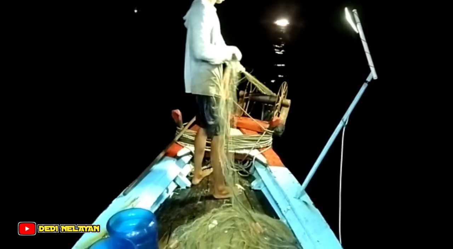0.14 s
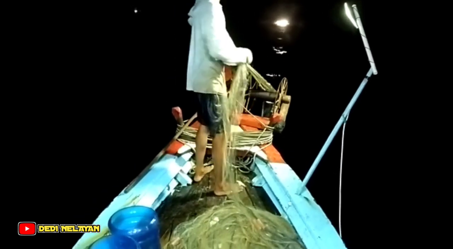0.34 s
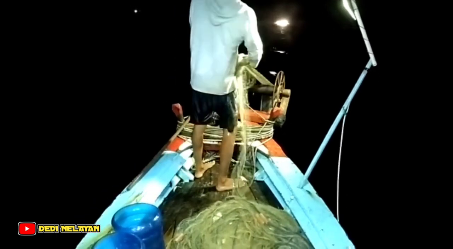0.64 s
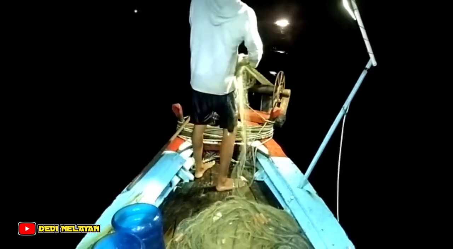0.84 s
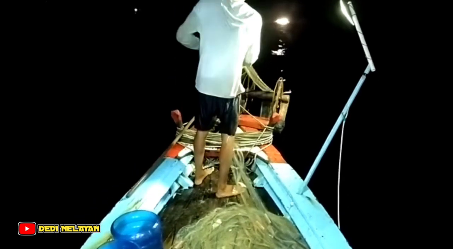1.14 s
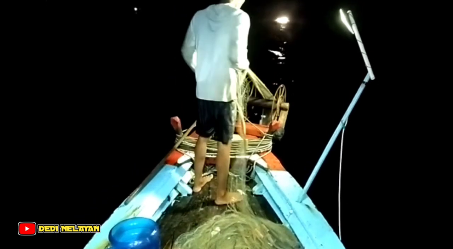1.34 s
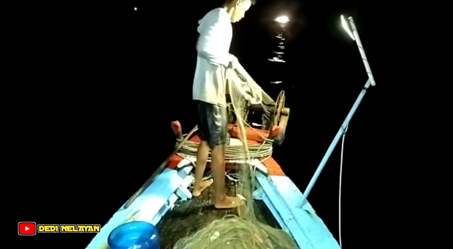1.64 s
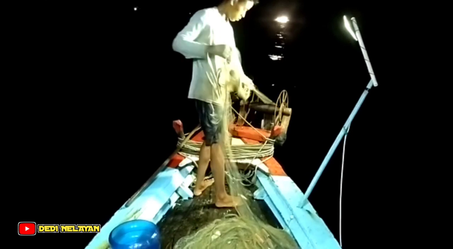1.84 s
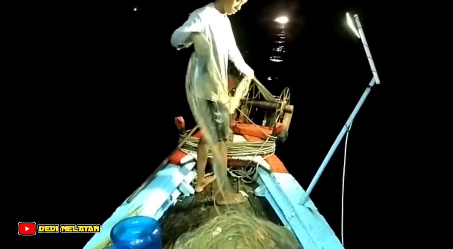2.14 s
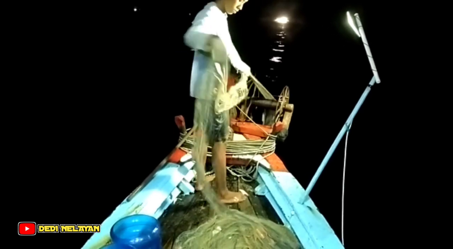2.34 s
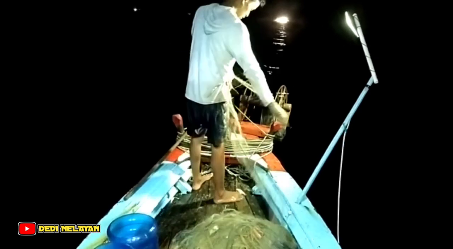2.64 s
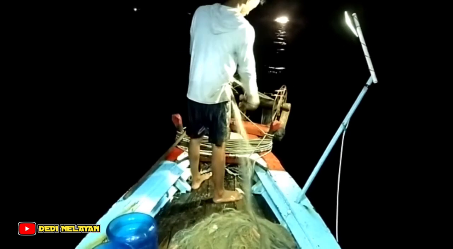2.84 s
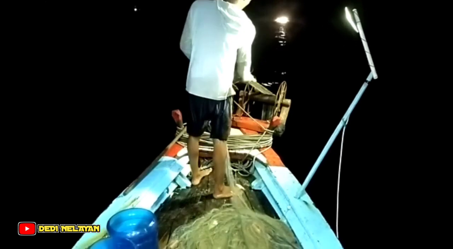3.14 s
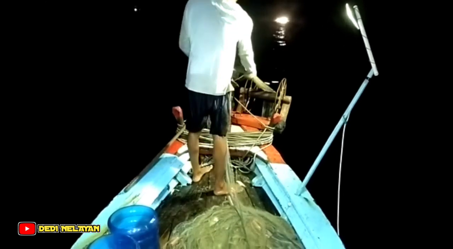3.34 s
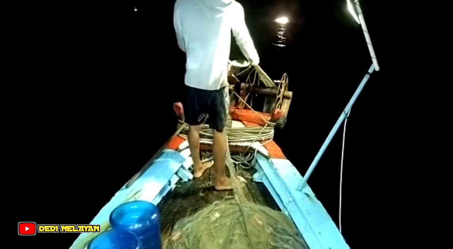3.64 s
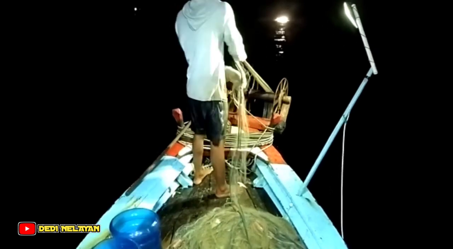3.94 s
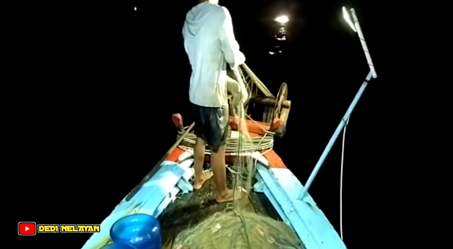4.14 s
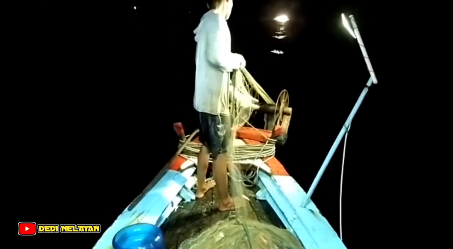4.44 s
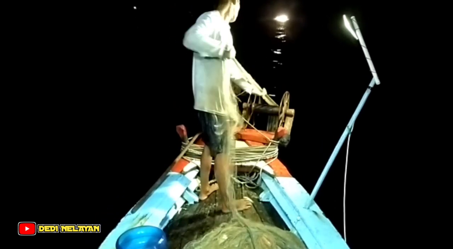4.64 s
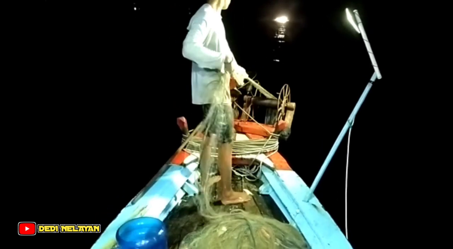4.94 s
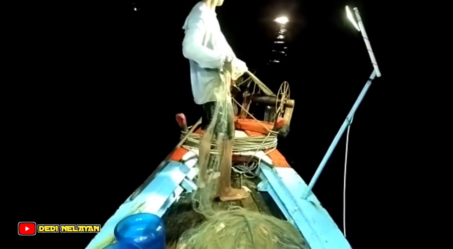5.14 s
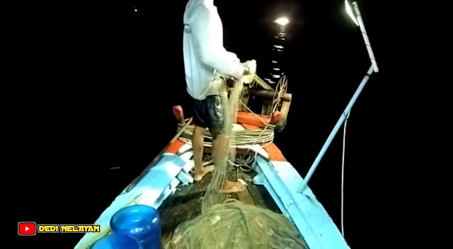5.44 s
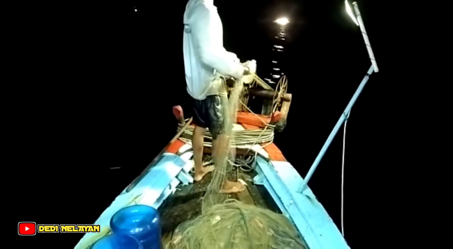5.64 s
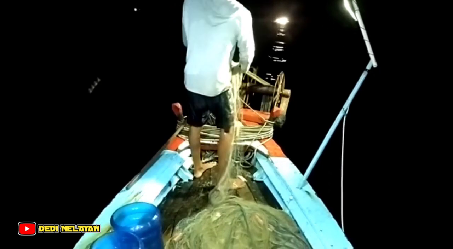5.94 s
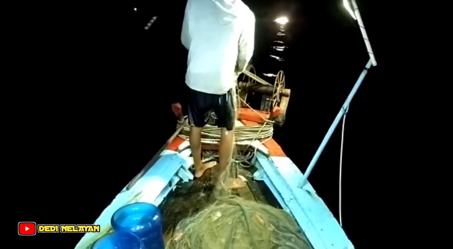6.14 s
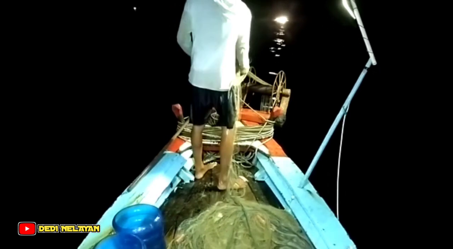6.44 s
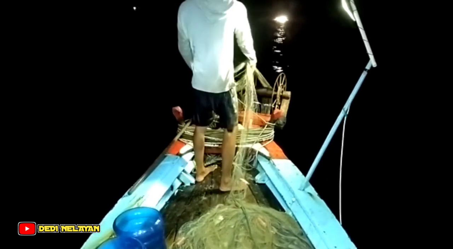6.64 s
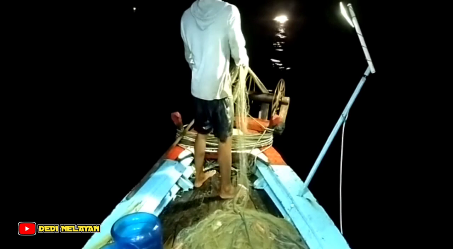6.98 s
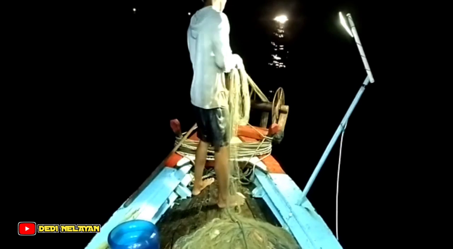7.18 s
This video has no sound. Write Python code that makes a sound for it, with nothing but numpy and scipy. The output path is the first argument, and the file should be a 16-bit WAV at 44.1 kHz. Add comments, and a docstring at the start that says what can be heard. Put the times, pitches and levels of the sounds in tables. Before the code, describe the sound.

Wet fishing net hauled into a small wooden boat at night: hollow hull thumps, float clacks, sharp mesh snaps, rustling and dripping water.

```python
"""Sinkers on a wet fishing net thump the hollow hull as it is hauled over a wooden roller into a small boat
at night: damped plank and hull modes. Floats clack and small sinkers touch as clusters of damped modes; hard
edges slap the rail. Mesh snaps, rustle, spray, rope drag and lapping water are shaped noise with small tones.
The axle ticks into the roller's resonances. Behind: keel swell, sea hiss and faint unsteady engine tones."""
import sys
import numpy as np
from scipy import signal
from scipy.fft import rfft, irfft, next_fast_len
from scipy.io import wavfile
from scipy.ndimage import uniform_filter1d, map_coordinates

SR = 44100
rng = np.random.default_rng(int(sys.argv[2]) if len(sys.argv) > 2 else 0)


def dump_mix(stems):
    """Bounce the given channels to the path in sys.argv[1] as a 16-bit WAV at rate SR."""
    frames = np.atleast_2d(stems).T  # one column per channel
    limited = np.clip(frames, -1, 1)  # hard clip at full scale
    pcm = np.round(limited * 32767).astype(np.int16)
    wavfile.write(sys.argv[1], SR, pcm)


N = 322363

# sinkers on the hull: t/s, peak level/dB, plank f/Hz, t60/s
HULL_THUMPS = [(.047, -24, 317, 0.091), (.443, -26.5, 431, 0.11), (.534, -40, 282, 0.095),
               (0.751, -39, 358, 0.18), (0.936, -30, 396, 0.13), (1.139, -37.5, 282.4, 0.49),
               (1.194, -34.5, 310, 0.029), (1.253, -28.5, 289, 0.23), (1.623, -32.5, 369, 0.065),
               (1.677, -22, 292.6, .15), (1.699, -27, 380, 0.052), (1.759, -36, 299, 0.3),
               (1.784, -28.5, 296, 0.11), (2.243, -51.5, 277, .19), (2.339, -31, 347.4, 0.075),
               (2.385, -44.5, 145, 0.086), (2.532, -40.5, 280, 0.13), (2.578, -33.5, 226, 0.086),
               (2.609, -50, 213, 0.18), (2.681, -40, 331, 0.1), (2.731, -52, 184, 0.14),
               (3.004, -38, 332, 0.11), (3.041, -37, 201, 0.086), (3.06, -39.5, 118, 0.18),
               (3.09, -31.5, 304, 0.032), (3.12, -28, 247, 0.11), (3.152, -39.5, 206, 0.36),
               (3.194, -23.5, 327.3, 0.15), (3.797, -47, 204, 0.14), (3.889, -43, 270, 0.12),
               (3.917, -45, 170, 0.28), (3.96, -49, 194, 0.2), (4.309, -31.5, 309, 0.12),
               (4.348, -41.5, 209.5, 0.48), (4.398, -38, 209, 0.22), (4.439, -43, 309, 0.18),
               (4.605, -36.5, 390, 0.091), (4.65, -29.5, 313.4, 0.16), (4.725, -22.5, 360.7, 0.086),
               (4.747, -29, 236, 0.043), (5.177, -35.5, 301, 0.1), (5.288, -28.5, 139.7, 0.2),
               (5.32, -36.5, 153, 0.19), (5.357, -40.5, 129, 0.3), (5.649, -50, 293, 0.11),
               (5.712, -48.5, 252, 0.66), (5.831, -36.5, 294, 0.087), (5.844, -33.5, 300, 0.13),
               (6.241, -53.5, 184, 0.23), (6.589, -41.5, 107, 0.036), (6.812, -42.5, 269, .2),
               (6.939, -48, 151, 0.067), (7.088, -37.5, 283, 0.2), (7.133, -36.5, 201, 0.099),
               (7.159, -42, 227, 0.056), (7.241, -53, 179, 0.16)]
# floats on the frame: t/s, peak level/dB, ring f/Hz, t60/s
FLOAT_CLACKS = [(.031, -37, 556, 0.073), (.241, -42.5, 944, 0.078), (.413, -41, 746, 0.084),
                (.43, -35.5, 794, 0.041), (.473, -39, 659, .043), (.631, -44, 860, 0.03),
                (.718, -43.5, 634, 0.18), (.773, -47.5, 1102, 0.11), (.814, -46, 1230, .1),
                (.88, -43, 1277, .16), (.936, -47.5, 1360, .056), (1.196, -40.5, 606, 0.044),
                (1.256, -34.5, 770, 0.033), (1.35, -42, 1100, 0.11), (1.481, -39.5, 643, 0.27),
                (1.674, -32.5, 1004, 0.06), (1.756, -41, 573, 0.14), (1.879, -53.5, 1023, 0.66),
                (1.929, -47.5, 1053, 0.3), (2.05, -47, 1048, .1), (2.256, -54.5, 618, 0.23),
                (2.339, -41.5, 591, 0.069), (2.528, -49, 810, 0.045), (2.608, -51, 1236, 0.1),
                (2.752, -42.5, 1065, .1), (2.789, -44.5, 886, 0.089), (2.819, -50.5, 683, 0.075),
                (3.014, -53, 681, 0.45), (3.046, -43, 713, 0.068), (3.111, -39.5, 566, 0.086),
                (3.186, -41.5, 580, 0.033), (3.359, -49.5, 795, 0.19), (3.389, -42.5, 631, 0.14),
                (3.926, -60, 774, 0.098), (4.299, -45, 540, 0.023), (4.607, -46, 710, 0.039),
                (4.651, -32.5, 550, 0.065), (4.693, -42, 860, 0.068), (4.72, -33.5, 603, 0.086),
                (4.739, -41, 560, 0.034), (4.941, -54, 1200, 0.076), (4.996, -45, 980, 0.12),
                (5.063, -46.5, 769, 0.091), (5.114, -58.5, 850, 0.13), (5.293, -43.5, 835, .11),
                (5.313, -42, 840, 0.048), (5.366, -53.5, 788, 0.092), (5.498, -58, 649, 0.36),
                (5.543, -60, 631, 0.23), (5.834, -55, 848, 0.56), (5.901, -49.5, 777, 0.09),
                (6.115, -61.5, 577, 0.12), (6.36, -49, 886, 0.66), (6.389, -41, 684, 0.11),
                (6.81, -50, 629, .1), (7.084, -52.5, 802, .1), (7.134, -45, 583, 0.056)]
# wet strands parting: t/s, level/dB, band centre f/Hz, treble level/dB, t60/s
MESH_SNAPS = [(0.0373, -38, 3060, -21, .057), (0.3316, -37, 2870, -17, 0.1), (.4288, -39.5, 3200, -24, .1),
              (0.5223, -35.5, 3860, -13, .046), (.672, -42, 3420, -12, 0.043),
              (0.7312, -21, 3160, -10.5, 0.024), (0.965, -45, 3650, -24, 0.032),
              (1.2494, -36.5, 2930, -13, 0.065), (1.287, -44, 3800, -8, 0.045),
              (1.3912, -46, 3150, -2, 0.035), (1.506, -44, 3470, -18, 0.11),
              (1.6357, -43, 2960, -12, 0.019), (1.6746, -36, 2950, -45, 0.036),
              (1.7122, -32, 3130, -31, .014), (1.8356, -46, 5000, 2, 0.027), (1.936, -43, 3150, -15, 0.054),
              (2.2463, -49, 3200, -22, 0.13), (2.3464, -48, 3450, -26, 0.056), (2.38, -51, 3770, -10, .058),
              (2.4314, -67, 5030, -15, 0.026), (2.6867, -50, 4500, -3, .04),
              (2.7339, -40.5, 3400, -26, 0.051), (2.8856, -41.5, 4240, -12, 0.021),
              (2.976, -48, 4520, -21, 0.023), (3.0194, -51, 3300, -16, 0.23),
              (3.029, -41.5, 6800, -29, 0.1), (3.0417, -37, 3400, -10, 0.09),
              (3.0846, -45, 3120, -3, 0.057), (3.1115, -29, 3140, -9, 0.038),
              (3.1844, -29, 3320, -18, 0.03), (3.297, -49, 5450, -7, .02),
              (3.3488, -35.5, 5130, -0.5, 0.022), (3.414, -36.5, 5700, 2, 0.021),
              (3.4379, -31, 4160, -5, 0.013), (4.091, -46.5, 7050, -49, 0.021),
              (4.1715, -50, 3480, -33, 0.038), (4.291, -40.5, 6230, -26, 0.024),
              (4.335, -35.5, 6300, -41, 0.021), (4.358, -39, 3220, 0, 0.016),
              (4.3824, -43, 2890, -13, .027), (4.413, -36, 2690, -21, 0.026),
              (4.434, -43, 6250, -20, 0.026), (4.476, -40.5, 6050, -50, 0.014),
              (4.5133, -44, 3350, -26, 0.032), (4.5994, -43, 3100, -30, 0.026),
              (4.689, -50, 2820, -32, 0.061), (4.7197, -31, 3070, -19, 0.044),
              (4.7704, -41.5, 4100, -11, 0.029), (4.8578, -40.5, 3360, -12, 0.021),
              (4.9895, -45.5, 4330, -8, .045), (5.0848, -49, 3770, -33, 0.022),
              (5.212, -52.5, 6500, -31, .03), (5.498, -60, 3980, -22, .08),
              (5.542, -51.5, 3280, -23, 0.075), (5.738, -57, 5500, -20, 0.033),
              (5.8194, -50, 4450, -18, 0.02), (5.8313, -39, 4070, -14, 0.03), (5.961, -54, 4140, -1, 0.11),
              (6.05, -54.5, 5500, 1, 0.017), (6.451, -45, 3530, 2, 0.025), (6.569, -51.5, 3960, -4, 0.19),
              (6.658, -47, 4480, -10, .03), (6.6764, -40, 4040, -38, .014), (6.725, -44, 4500, -28, 0.018),
              (6.7488, -31, 4430, -36, 0.016), (6.8053, -40.5, 3640, -9, 0.036),
              (6.8307, -43.5, 3000, -17, 0.13), (6.9367, -51, 2880, -9, 0.041),
              (7.081, -47, 2730, -12, 0.12), (7.1207, -43.5, 2860, -8.5, 0.13),
              (7.2747, -47, 3900, -16, 0.05)]


def thumps():
    """The struck plank's pitch sinks slightly; hull modes near it answer, the higher dying sooner."""
    # hull modes: f/Hz, level/dB
    hull_modes = [(98, -5), (125, -5), (155, -8.5), (186, -13), (222, -1), (255, -0.5), (305, 2), (345, 2),
                  (380, 0.5), (430, 4.5), (480, 0), (560, -5.5)]
    contact_s = 0.0058
    out, t = np.zeros((2, N)), np.arange(SR // 5) / SR
    hz, mode_db = np.transpose(hull_modes)[:, :, None]
    for s, db, plank_hz, t60_s in HULL_THUMPS:
        level_chance, phase_chance = rng.standard_normal((2, len(hull_modes), 1))
        near_db = -np.minimum(30 * np.abs(np.log2(hz / plank_hz)) ** 1.69, 20.5)
        plank_t60_s = max(t60_s, 0.02)
        mode_t60_s = plank_t60_s * (plank_hz / hz) ** 0.92
        mode_gain = amp(mode_db + near_db + 3.3 * level_chance - 60 * t / mode_t60_s)
        hull = mode_gain * np.cos(2 * np.pi * hz * t + 1.82 * phase_chance)
        plank_cycles = plank_hz * np.cumsum(1 + 0.12 * np.exp(-t / 0.014)) / SR
        plank = amp(-60 * t / plank_t60_s) * np.sin(2 * np.pi * plank_cycles)
        # force builds up over the contact time
        force = np.sin(np.pi / 2 * np.minimum(t / contact_s, 1)) ** 2
        ring = (plank + 1.09 * hull.sum(axis=0)) * force
        add(out, s, amp(db) * ring / np.abs(ring).max())
    return out


def slaps():
    """A hard edge strikes the rail: one sharp push and pull, then a broad woody rattle."""
    # strikes: t/s, push level/dB, centre f/Hz, rattle t60/s
    strikes = [(0.4483, -16.5, 700, 0.2), (1.256, -62, 770, 0.05), (1.6752, -20.5, 1065, 0.14),
               (3.186, -33, 930, 0.14), (4.718, -29, 930, 0.2), (5.833, -46, 1150, 0.39)]
    out, t = np.zeros((2, N)), np.arange(4096) / SR
    f = np.fft.rfftfreq(len(t), 1 / SR) + 1
    for s, db, hz, t60_s in strikes:
        push = -np.sin(2 * np.pi * hz * t) * np.exp(-(hz * t - 0.5) ** 2 / 0.14)
        band = amp(-14 * np.log2(f / hz) ** 2)
        rattle = unit(irfft(rfft(rng.standard_normal(len(t))) * band))
        fade = amp(-60 * t / t60_s) * (1 - np.exp(-t / 0.0009))
        add(out, s, amp(db) * (push + 0.11 * rattle * fade))
    return out


def clacks():
    """Hollow floats knock on the frame and small sinkers touch: clusters of damped modes."""
    # small sinkers touching: t/s, peak level/dB, ring f/Hz, t60/s
    plinks = [(0.332, -45, 1667, 0.075), (.3482, -42, 1414, 0.04), (0.5193, -32, 2384, 0.027),
              (.611, -43, 2096, .047), (1.3493, -42, 1810, .087), (1.4038, -43.5, 2560, 0.025),
              (1.6756, -43, 1344, 0.095), (1.926, -49, 2410, .07), (2.0518, -42.5, 1830, 0.046),
              (2.7661, -45.5, 1395, 0.13), (3.0464, -45.5, 2220, 0.052), (3.196, -41.5, 1400, 0.05),
              (3.5444, -58.5, 1450, 0.13), (3.7728, -57, 2200, 0.054), (3.792, -52, 2440, .031),
              (4.4131, -40.5, 1460, 0.035), (4.6797, -43.5, 1370, 0.045), (4.7977, -51.5, 1800, 0.074),
              (5.0623, -40, 1730, .055), (5.127, -52, 1654, .04), (5.22, -55, 1430, 0.039),
              (5.3213, -48.5, 1860, 0.06), (5.4955, -52, 1890, 0.059), (5.542, -50.5, 1954, 0.031),
              (6.2575, -52, 2514, .076), (6.3583, -55.5, 1623, .089), (6.4618, -50, 1365, 0.076),
              (6.591, -55, 1440, 0.087), (6.8286, -45.5, 1378, .11), (7.0307, -51.5, 2660, .05),
              (7.0452, -54, 2100, 0.036)]
    # modes of a float: pitch ratio, level/dB
    float_modes = [(0.839, -7.5), (0.939, -2.5), (1, 4.5), (1.072, -2.5), (1.219, -4), (1.449, -4.5),
                   (1.75, -4.5), (2.2, -10.5), (2.6, -9)]
    # modes of a small sinker: pitch ratio, level/dB
    sinker_modes = [(0.902, -10), (0.968, -24.5), (0.998, -4), (1.048, -10), (1.154, -9)]
    pan_db = -0.2  # left over right
    out = np.zeros((2, N))
    ratio, mode_db = np.transpose(float_modes)[:, :, None]
    for s, db, hz, t60_s in FLOAT_CLACKS:
        ring = ringing(hz * ratio, mode_db, t60_s, attack_s=0.00067)
        add(out, s, placed(ring, db, pan_db, lag_spread=4.8))
    ratio, mode_db = np.transpose(sinker_modes)[:, :, None]
    for s, db, hz, t60_s in plinks:
        ring = ringing(hz * ratio, mode_db, t60_s, attack_s=0.0016)
        add(out, s, placed(ring, db, pan_db, lag_spread=6.3))
    return out


def snaps():
    """Wet strands part: noise puffs in a broad band plus a treble band, partly alike left and right."""
    pan_db = np.array([[2.3 / 2], [-2.3 / 2]])  # left over right
    out, t = np.zeros((2, N)), np.arange(4096) / SR
    f = np.fft.rfftfreq(len(t), 1 / SR) + 1
    for s, db, hz, treble_db, t60_s in MESH_SNAPS:
        noise = rng.standard_normal((3, len(t)))
        pair = 0.82 * noise[0] + noise[1:]
        treble = amp(treble_db) / (1 + (7500 / f) ** 6) / (1 + (f / 12000) ** 3)
        band = amp(-22 * np.log2(f / hz) ** 2) + treble
        fade = amp(-60 * t / max(t60_s, 0.005)) + 1.56 * amp(-60 * t / 0.025)
        puff = unit(irfft(rfft(pair) * band)) * fade * (1 - np.exp(-t / 0.0048))
        add(out, s, amp(db - 10 + pan_db) * puff)
    return out


def net(rustle, mist):
    """Mesh rustle and spray: noise gated by one crackle of contacts, plus short tones for the knots."""
    # rustle spectrum: f/Hz, level/dB
    mesh_spectrum = [(1060, -17), (1800, -2.5), (2620, -7), (2790, -0.5), (3210, -4), (3500, -5.5),
                     (5060, -8.5), (7000, -10), (9100, -23), (15400, -120)]
    # spray spectrum: f/Hz, level/dB
    spray_spectrum = [(3240, -5), (5500, -3), (5800, -5.5), (8670, -3.5), (11400, -14), (14400, -13.5),
                      (15100, -14), (15800, -28.5)]
    crackle = bursts(420, spread_db=0, life_s=0.0037)
    knots = amp(-16.5) * rustle * droplets(count=1200, centre_hz=3950, cycles=0.71, spread_db=-3.0)
    mesh = rustle * texture(mesh_spectrum, 0.45 + crackle, patchy_db=4.5)
    spray = mist * texture(spray_spectrum, 1.2 + crackle, patchy_db=4.0)
    return knots + mesh + spray


def rope_drag(rumble):
    """Rope rumbles on the planks: low noise gated by slow random contacts."""
    # plank spectrum: f/Hz, level/dB
    plank_spectrum = [(65, -30), (110, -10.5), (189, 4.5), (242, -5), (354, -1.5), (486, -17.5),
                      (618, -28.5), (700, -21), (910, -37.5), (1540, -120)]
    grain = 0.35 + bursts(35, spread_db=6.5, life_s=0.026)
    return rumble * texture(plank_spectrum, grain, patchy_db=None)


def water(lapping):
    """Lapping is patchy, grainy noise; drips are short tones rising in pitch."""
    # lapping spectrum: f/Hz, level/dB
    water_spectrum = [(260, -18.5), (450, 0.5), (617, -1), (822, -1), (1100, -4), (1440, -8.5), (1560, -8),
                      (2500, -20), (3250, -18), (5500, -120)]
    grain = 2.83 + bursts(70, spread_db=9.0, life_s=0.0055)
    lap = lapping * texture(water_spectrum, grain, patchy_db=5.5)
    drops = amp(-9.0) * lapping * droplets(count=900, centre_hz=1302, cycles=9.1, spread_db=3.0)
    return lap + drops


def keel(swell):
    """Swell under the keel: deep noise of wandering level."""
    # keel spectrum: f/Hz, level/dB
    keel_spectrum = [(15, -57), (25, -25), (65, -19), (115, -9), (140, -1.5), (180, -50.5), (310, -120)]
    return swell * texture(keel_spectrum, amp(2.3 * wobble(3.5)), patchy_db=None)


def sea():
    """Far sea: steady faint hiss."""
    # sea spectrum: f/Hz, level/dB
    sea_spectrum = [(100, -26), (1000, -3), (4000, 2), (9000, 11.5), (15800, 2)]
    return amp(-89.5) * texture(sea_spectrum, 1, patchy_db=None)


def hauling():
    """The haul, its strokes and the aftermath of each contact drive net, rope, water and keel."""
    # base gains: t/s, mesh rustle level/dB, spray level/dB, lapping level/dB, keel swell level/dB
    haul = [(0.0, -71, -63.5, -49, -63), (0.3, -59, -69.5, -60.5, -85), (0.57, -66, -72.5, -56.5, -63.5),
            (1.12, -65.5, -70.5, -57.5, -64), (1.57, -62.5, -72.5, -57, -92), (1.83, -66, -75.5, -57, -70),
            (2.12, -70.5, -77.5, -67.5, -75), (2.52, -70.5, -71.5, -70, -66.5),
            (3.03, -74.5, -75, -71.5, -71), (3.26, -76.5, -77, -68, -82), (3.54, -75, -99, -75.5, -81.5),
            (3.85, -82.5, -81, -75.5, -70.5), (4.27, -81, -72, -81.5, -74), (4.78, -64.5, -79, -66, -61),
            (5.01, -71, -81, -75, -69.5), (5.46, -87.5, -94.5, -71, -69.5), (6.21, -81, -83.5, -80.5, -70),
            (6.56, -73, -82.5, -62.5, -61), (7.11, -72, -77.5, -77, -74.5), (7.31, -71, -74, -66, -57)]
    # an armful of net swings past: middle t/s, length/s, level/dB
    swishes = [(.39, 0.39, -69), (1.44, 0.29, -100), (1.79, 0.1, -61), (2.06, 0.34, -58.5), (3.1, .2, -59),
               (3.42, 0.11, -64.5), (4.1, 0.18, -80), (4.36, 0.19, -70), (5.01, 0.27, -78),
               (5.3, 0.34, -83), (5.55, 0.13, -87), (5.9, 0.18, -74), (6.43, 0.28, -71.5),
               (6.74, 0.61, -75.5), (7.15, 0.14, -75)]
    # foot rope scrapes the planks: middle t/s, length/s, level/dB
    drags = [(.15, 0.35, -81), (.75, 0.14, -75), (1.05, 0.48, -67), (1.4, 0.083, -51), (2.7, 0.34, -51),
             (3.28, 0.11, -82), (3.92, 0.31, -60.5), (4.44, 0.73, -58.5), (4.9, 0.097, -77),
             (5.68, 0.34, -66), (5.9, 0.33, -62), (6.53, .25, -77), (7.25, .2, -60.5)]
    rustle, mist, lapping, swell = amp(curves(haul))
    # hull rumbles on after each blow
    struck = aftermath(HULL_THUMPS, level_db=-21, rise_s=0.0071, t60_s=0.54)
    # water shaken off after each float
    slosh = aftermath(FLOAT_CLACKS, level_db=-12, rise_s=0.012, t60_s=0.12)
    # rustle and spray after each snap
    shed = aftermath(MESH_SNAPS, level_db=-27.5, rise_s=0.005, t60_s=0.21)
    moved = strokes(swishes) + shed
    rumble = amp(-1) * lapping + struck + strokes(drags)
    return (net(rustle + moved, mist + amp(-5.5) * moved) + rope_drag(rumble)
            + water(lapping + slosh) + keel(swell + amp(-18.5) * struck))


def roller():
    """The loose axle ticks fast and unevenly into the roller's resonances; each tick has a bright edge."""
    # roller resonances: f/Hz, width/Hz, level/dB
    resonances = [(1444, 41, 2), (3090, 170, -15), (3150, 73, 0), (3740, 88, -2)]
    # rattle level: t/s, level/dB
    turning = [(0, -71), (1, -77), (2, -63), (2.3, -70.5), (2.6, -65.5), (2.9, -68), (3.3, -92),
               (3.65, -94), (4, -75), (4.3, -73), (4.7, -87), (5.1, -67.5), (5.4, -81.5), (6.2, -99),
               (6.6, -100), (7.31, -70)]
    ticks_per_s, scatter, life_s, edge_db = 42, 0.3, 0.0028, -19.5
    turns = np.cumsum(ticks_per_s * (1 + scatter * np.clip(wobble(30), -2, 2))) / SR
    starts = np.diff(np.floor(turns), prepend=0) * amp(4.6 * rng.standard_normal(N))
    ticks = signal.lfilter([1], [1, -np.exp(-1 / (life_s * SR))], starts)

    def response(f):
        edge = amp(edge_db) / (1 + (4500 / (f + 1)) ** 4) / (1 + (f / 8500) ** 6)
        ring = sum(amp(db) * 1j * f * w / (c * c - f * f + 1j * f * w) for c, w, db in resonances)
        return ring + edge

    rattle = filtered((0.21 + ticks) * rng.standard_normal((2, N)), response)
    return amp(curves(turning)[0]) * unit(rattle)


def engine():
    """Far engine: faint sines of slightly unsteady pitch and level."""
    # engine tones: f/Hz, level/dB
    engine_tones = [(94, -74.5), (140.5, -75.5), (188.5, -70)]
    # common level: t/s, level/dB
    engine_swell = [(0, 1.5), (1, 6.5), (2, 0.5), (2.4, 1), (3, 3.5), (3.65, -4.5), (4.1, 3.5), (5, -5.5),
                    (5.6, 0), (6.2, 0), (6.8, -3.5), (7.31, -1)]
    tones = np.zeros(N)
    for hz, db in engine_tones:
        gain = amp(db - 2.5 + 3 * wobble(18))
        cycles = hz * np.cumsum(1 + 0.0071 * wobble(15)) / SR
        tones += gain * np.sin(2 * np.pi * cycles)
    return np.sqrt(2) * amp(curves(engine_swell)[0]) * tones


def boat(x, t60_s):
    """Short scattered reflections from the sides of the open boat."""
    t = np.arange(SR // 4) / SR
    tail = rng.standard_normal((2, len(t))) * amp(-60 * t / t60_s)
    return signal.fftconvolve(x, tail / np.linalg.norm(tail[0]), axes=1)[:, :N]


def ringing(hz, level_db, t60_s, attack_s):
    """Damped modes at slightly random strengths and pitches; higher modes die sooner."""
    t = np.arange(SR // 8) / SR
    level_chance, pitch_chance, phase_chance = rng.standard_normal((3, len(hz), 1))
    mode_t60_s = max(t60_s, 0.015) * np.median(hz) / hz
    gain = amp(level_db + 2.24 * level_chance - 60 * t / mode_t60_s)
    phase = 2 * np.pi * hz * (1 + 0.013 * pitch_chance) * t + 0.87 * phase_chance
    return (gain * np.sin(phase)).sum(axis=0) * (1 - np.exp(-t / attack_s))


def placed(sound, db, pan_db, lag_spread):
    """Stereo copy at a peak level, panned, the right channel a few random samples late."""
    lag = round(abs(rng.normal(0, lag_spread)))
    pair = [sound, np.pad(sound, (lag, 0))[:len(sound)]]
    return amp(db + np.array([[pan_db / 2], [-pan_db / 2]])) * pair / np.abs(sound).max()


def droplets(count, centre_hz, cycles, spread_db):
    """Random drops or knots: short damped tones whose pitch rises a little; rms 1."""
    draw, t = rng.random((count, 4)), np.arange(450) / SR
    hz = centre_hz * 2 ** (2.4 * (draw[:, [0]] - 0.5))
    fade = np.exp(-hz * t / cycles) * (1 - np.exp(-t / 0.00075))
    tone = np.sin(2 * np.pi * hz * t * (1 + 4.0 * t)) * fade
    size = amp(-spread_db * np.log(draw[:, [1]] + 0.035))
    where = (draw[:, [2]] * N).astype(int) + np.arange(len(t))
    left = np.cos(np.pi / 2 * (0.21 + 0.5 * draw[:, [3]]))
    sides = (left, np.sqrt(1 - left ** 2))
    return unit(np.array([np.bincount(where.ravel(), (side * size * tone).ravel(), minlength=N)[:N]
                          for side in sides]))


def bursts(rate, spread_db, life_s):
    """Envelope of rate random contacts a second, each with a quick start and exponential decay."""
    starts = (rng.random(N) < rate / SR) * amp(spread_db * np.minimum(rng.exponential(1, N), 2.5))
    return uniform_filter1d(signal.lfilter([1], [1, -np.exp(-1 / (life_s * SR))], starts), size=60)


def texture(spectrum, grain, patchy_db):
    """Stereo noise of rms 1, gated by grains, with optional patches of random gain."""
    # left-right likeness: f/Hz, correlation
    likeness = [(60, 0.66), (150, 1), (380, 0.74), (950, 0.59), (2380, 0.089), (5980, 0.022), (15000, 0.26)]
    pair = grain * rng.standard_normal((2, N))
    if patchy_db is not None:
        pair = patches(pair, patchy_db)

    def mid_side(hz):
        turn = np.arccos(np.clip(along(likeness, hz), -1, 1)) / 2
        return amp(along(spectrum, hz)) * [np.cos(turn), np.sin(turn)]

    mid, side = filtered(pair, mid_side)
    both = np.array([mid + side, mid - side])
    # the slow level is set by the hauling, not by chance
    slow_power = np.abs(uniform_filter1d(np.mean(both ** 2, axis=0), size=SR // 4))
    return unit(both / np.sqrt(slow_power + 1e-20))


def patches(noise, patchy_db):
    """Random gain that changes slowly over time and frequency."""
    z = signal.stft(noise.astype(np.float32), nperseg=512)[2]
    field = uniform_filter1d(rng.standard_normal(z.shape[1:]), size=4, axis=0)
    field = uniform_filter1d(field, size=8, axis=1)
    gain = amp(patchy_db * unit(field)).astype(np.float32)
    return signal.istft(z * gain, nperseg=512)[1][:, :N]


def aftermath(events, level_db, rise_s, t60_s):
    """Gain curve that swells after each event, more for longer rings, and dies away."""
    usual_t60_s = 0.096
    kicks = np.zeros(N)
    for s, db, *_, ring_t60_s in events:
        kicks[round(s * SR)] += amp(2 * (db + level_db)) * abs(ring_t60_s) / usual_t60_s
    t = np.arange(SR) / SR
    decay = amp(-120 * t / max(t60_s, 0.05)) * (1 - np.exp(-t / max(rise_s, 0.001)))
    power = signal.fftconvolve(kicks, decay)[:N]
    return np.sqrt(np.abs(power))


def strokes(events):
    """Gain curve that swells and fades smoothly around each middle."""
    t = np.arange(N) / SR
    return sum(amp(db) * np.cos(np.pi * np.clip((t - s) / max(length_s, 0.05), -0.5, 0.5)) ** 2
               for s, length_s, db in events)


def amp(db):
    """dB to gain."""
    return np.exp(np.asarray(db) * (np.log(10) / 20))


def unit(x):
    """x at rms 1."""
    return x / np.sqrt(np.mean(x ** 2) + 1e-20)


def along(points, hz):
    """Interpolate (f/Hz, value) points on a log axis."""
    f, v = np.transpose(points)
    return np.interp(np.log(hz + 1), np.log(f + 1), v)


def curves(rows):
    """One value per sample for each column after the time."""
    s, *cols = np.transpose(rows)
    return [np.interp(np.arange(N) / SR, s, c) for c in cols]


def wobble(rate):
    """A smooth random curve, rate knots a second."""
    coarse = np.arange(0, N + 64, 64)
    knots = rng.standard_normal(int(N * rate / SR) + 4)
    return np.interp(np.arange(N), coarse, map_coordinates(knots, [coarse * rate / SR]))


def filtered(x, response):
    """x times a response of frequency."""
    m = next_fast_len(N + 8192)
    return irfft(rfft(x, m) * response(np.fft.rfftfreq(m, 1 / SR)), m)[..., :N]


def add(track, s, sound):
    """Mix a sound into the track at time s."""
    part = track[..., round(s * SR):][..., :sound.shape[-1]]
    part += sound[..., :part.shape[-1]]


def scene():
    """Everything on deck and beyond; clacks and snaps also echo in the boat."""
    light = clacks() + snaps()
    echo = amp(-8.5) * boat(light, t60_s=0.3)
    return thumps() + slaps() + light + echo + hauling() + roller() + sea() + engine()


def record(dry):
    """Bass roll-off, right channel slightly late, nothing above the band limit."""
    top_hz, bass_hz, right_lag_s = 15750, 45, 2.4e-5

    def response(hz):
        lag = np.exp(-2j * np.pi * hz * np.array([[0], [right_lag_s]]))
        bass = (1j * hz / (bass_hz + 1j * hz)) ** 2
        return lag * bass * (hz < top_hz)

    return filtered(dry, response)


dry = scene()
out = record(dry)
dump_mix(out)
```